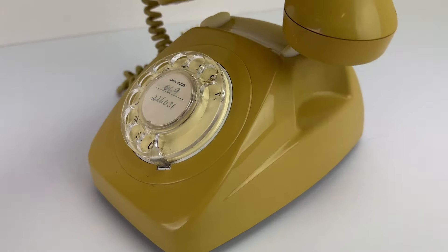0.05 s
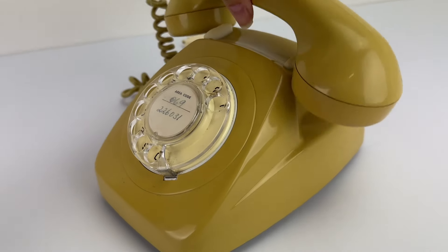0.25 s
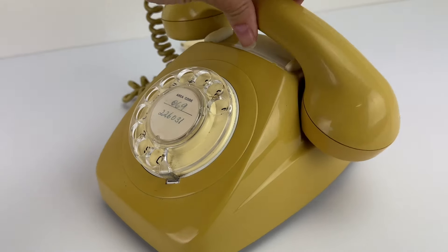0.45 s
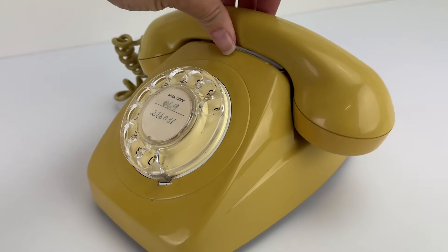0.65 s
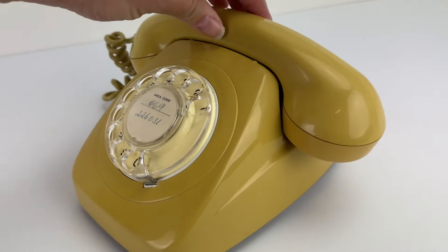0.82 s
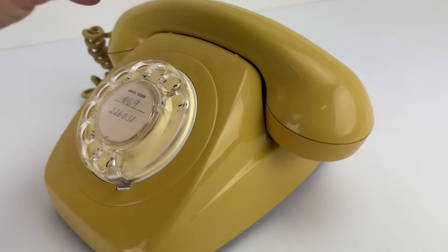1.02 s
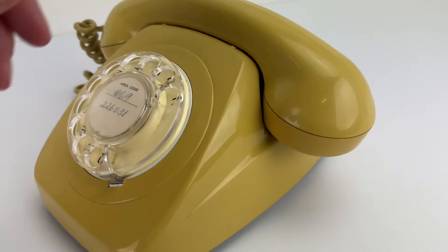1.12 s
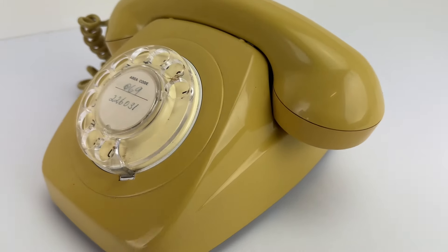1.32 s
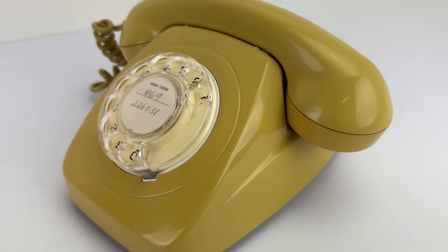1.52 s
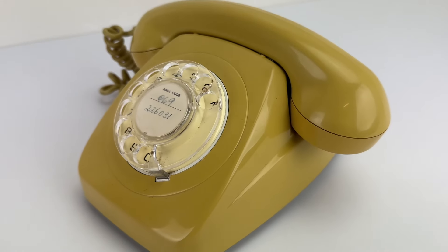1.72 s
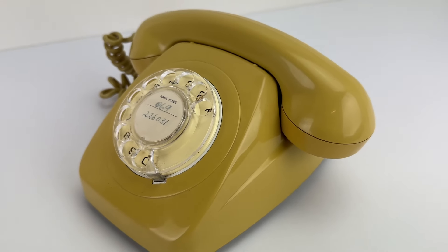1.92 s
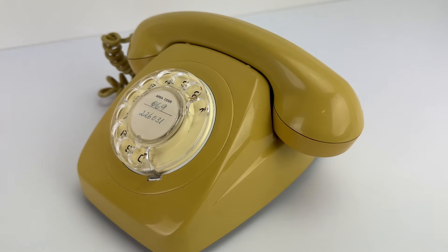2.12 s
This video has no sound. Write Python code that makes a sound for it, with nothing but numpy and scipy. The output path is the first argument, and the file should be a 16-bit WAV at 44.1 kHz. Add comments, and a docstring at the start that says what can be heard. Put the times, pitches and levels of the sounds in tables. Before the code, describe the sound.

A hollow plastic telephone handset lands on its cradle, close up in a small room. A faint touch at 0.07 seconds, then a rapid clatter at 0.25-0.29 with a low table thud, a lighter knock at 0.42, small switch ticks around 0.5, and hard clacks at 0.59 and 0.67. Brief gritty sliding and short reflections fade by 0.9; faint rustles near 1.3 and 1.6 over soft low rumble.

```python
"""A small quiet room: a hard plastic telephone handset is lowered onto its cradle.
Knocks ring the modes of the hollow shell under noise cracks; low damped tones thud in the table.
The hook switch ticks and snaps, the handset slides as grainy hiss, and a faint rustle follows
as the hand leaves. Dense reflections and a low noise rumble fill the room."""
import sys
import numpy as np
from scipy import signal
from scipy.fft import rfft, irfft, next_fast_len
from scipy.io import wavfile

SR = 44100
rng = np.random.default_rng(int(sys.argv[2]) if len(sys.argv) > 2 else 0)


def int16_out(signal):
    """Quantize to a 16-bit WAV file."""
    q = np.round(np.clip(np.atleast_2d(signal).T, -1, 1) * 32767)
    wavfile.write(sys.argv[1], SR, q.astype(np.int16))


def volts_from_decibels(level):
    """Turn decibel levels (scalar or array-like) into linear amplitude factors."""
    exponent = np.asarray(level, float) / 20
    return 10 ** exponent


N = 94815  # samples


def rms_one(x):
    """Scale to rms 1."""
    return x / np.sqrt(np.mean(x ** 2) + 1e-20)


def at_hz(points, hz):
    """Read a table on a log-frequency axis."""
    table_hz, value = np.array(points)[:, 0], np.array(points)[:, 1]
    return np.interp(np.log(hz), np.log(table_hz + 1), value)


def drift(rate_hz):
    """Slow random wander of spread 1: low-passed noise made at SR / 40."""
    pole = np.exp(-2 * np.pi * rate_hz * 40 / SR)
    white = rng.standard_normal(N // 40 + 2002)
    slow = signal.lfilter([1], [1, -2 * pole, pole * pole], white)[2000:]  # settled part
    return np.interp(np.arange(N) / 40, np.arange(len(slow)), rms_one(slow))


def add(out, start_s, sound):
    """Mix a sound in at its start time."""
    start = int(start_s * SR)
    out[start:start + len(sound)] += sound


def decay_pole(t60_s):
    """One-pole coefficient that falls 60 dB in t60_s."""
    return volts_from_decibels(-60 / (t60_s * SR))


def ring(start_s, hz, t60_s, rise_cycles):
    """A struck mode swells, then dies, for at most 0.25 s; also gives time since the blow."""
    start = int(start_s * SR)
    samples = np.arange(start, min(start + SR // 4, N))
    t = np.maximum(samples / SR - start_s, 0)
    swell = 1 - np.exp(-t * hz / rise_cycles)
    return t, np.sin(2 * np.pi * hz * t) * swell * volts_from_decibels(-60 * t / t60_s)


EDGES_HZ = 22 * 2 ** np.arange(0, 9.6, .4)


def bands(spectrum, size, channels):
    """Yield centre_hz and coloured noise of each band whose centre lies in the spectrum."""
    white = rng.standard_normal((2, channels, size + 4000))  # neighbouring bands use different noise
    for k, (low_hz, high_hz) in enumerate(zip(EDGES_HZ, EDGES_HZ[1:])):
        centre_hz = np.sqrt(low_hz * high_hz)
        if spectrum[0][0] <= centre_hz <= spectrum[-1][0]:
            sos = signal.butter(2, [low_hz, high_hz], "band", fs=SR, output="sos")
            noise = signal.sosfilt(sos, white[k % 2])[:, 4000:]
            yield centre_hz, volts_from_decibels(at_hz(spectrum, centre_hz)) * noise


# plastic decay before scaling: pitch_hz, t60_s
CRACK_T60 = [(700, 0.031), (3000, 0.052), (8000, 0.053), (16000, 0.0094)]


def bursts(starts_s, levels_db, spectrum, t60_scale):
    """Noise starts at each time and dies at its own pace in each band."""
    clicks = np.full(N, 1e-18)
    np.add.at(clicks, (np.asarray(starts_s) * SR).astype(int), volts_from_decibels(levels_db))
    out = np.zeros(N)
    for hz, noise in bands(spectrum, size=N, channels=1):
        pole = decay_pole(t60_scale * at_hz(CRACK_T60, hz))
        out += noise[0] * signal.lfilter([1], [1, -pole], clicks)
    return out


# shell blows: start_s, ring_db, tilt_db_per_octave, pitch_ratio, free_ring_s (until grip or cradle damps)
KNOCKS = [(0.0659, -44, -12, 1.2, 0.0057), (0.245, -24.5, 4.5, 1.16, 0.005),
          (0.2473, -15.5, -1, 0.93, .003), (0.2534, -15.5, 0.5, 1.04, .003), (0.2687, -23, 6.5, 1.1, .003),
          (.2700, -18, 4, 0.97, 0.0098), (.2737, -12, -1, 1.032, .007), (.2870, -28.5, 0.5, 1.3, 0.0027),
          (.4203, -20.5, 2.5, 1.04, .007), (.4320, -27.5, 6, 0.81, .008), (0.5846, -32, 8, 0.89, 0.0046),
          (.5888, -15.5, -3.5, 0.94, 0.0038), (0.5935, -17.5, 2, 0.93, 0.0036),
          (.6035, -18, 0, 0.96, 0.0053), (0.651, -43, 1, 1.7, .003), (0.6678, -25.5, 5.5, 0.56, 0.001),
          (0.6705, -10, 0, 1.031, .017), (.6950, -28.5, 1, 1.12, 0.013)]
# free modes of the hollow handset and case: pitch_hz, level_db, t60_s
SHELL = [(242.7, -13.5, .06), (385.2, -5, 0.13), (478.2, -4.5, 0.071), (528, 5.5, .11), (590, -3, 0.039),
         (679, -5, 0.098), (987, -12.5, 0.079), (1175, -10, 0.099), (1274, -17.5, 0.09),
         (1538, -11.5, 0.031), (1956, -31, 0.11), (2260, -22.5, 0.15), (2604, -22.5, 0.15),
         (3030, -31, .04), (3710, -38.5, 0.12), (5200, -33, 0.0067)]
RISE_CYCLES = 0.63  # swell time constant
SPOT_DB = 1.5  # random spread of mode levels with the struck spot
IN_STEP_HZ = (350, 800)  # modes inside start in step, others alternate in sign
DAMPED_T60_S, DAMPED_DB = .028, -15.5  # fast loss once damped; share that rings on
SHELL_ROUGH = .8  # loose parts blur what rings on


def shell():
    """Each knock swells all shell modes; damping then kills most of the ring."""
    out = np.zeros(N)
    spots = rng.standard_normal((len(KNOCKS), len(SHELL)))
    hz, mode_db, t60_s = np.transpose(SHELL)
    blur = 1 + SHELL_ROUGH * drift(60)
    in_step = (hz > IN_STEP_HZ[0]) & (hz < IN_STEP_HZ[1])
    sign = np.where(in_step, 1, (-1) ** np.arange(1, len(hz) + 1))
    for (start_s, ring_db, tilt_db, pitch, free_s), spot in zip(KNOCKS, spots):
        t, modes = ring(start_s, pitch * hz[:, None], t60_s[:, None], RISE_CYCLES)
        brightness_db = tilt_db * np.log2(hz / 540)
        gains = sign * volts_from_decibels(ring_db + mode_db + brightness_db + SPOT_DB * spot)
        damped = volts_from_decibels(-60 * np.maximum(t - free_s, 0) / DAMPED_T60_S)
        rings_on = volts_from_decibels(DAMPED_DB) * (1 - damped) * blur[int(start_s * SR):][:len(t)]
        add(out, start_s, gains @ modes * (damped + rings_on))
    return out


# hardest contacts: start_s, level_db
CRACKS = [(0.0655, -36), (0.243, -29.5), (0.244, -31.5), (0.255, -27), (0.2675, -21.5), (0.27, -47),
          (0.29, -40), (0.4208, -33), (0.438, -48), (0.5852, -19), (.5890, -24.5), (0.595, -26),
          (0.65, -32.5), (0.6683, -17), (0.678, -23), (0.689, -28)]
# plastic on plastic: pitch_hz, density_db_per_hz
CRACK = [(700, -19.5), (1500, 5.5), (3000, -0.5), (4200, -0.5), (6300, -10), (8500, -2.5), (11000, -2.5),
         (14000, -19), (16000, -20)]
SPIT_DB, SPIT_T60_SCALE = 3.5, .2  # first instant of a crack


def cracks():
    """Hard contacts burst into noise: a brief spit over a longer decay."""
    start_s, level_db = np.transpose(CRACKS)
    body = bursts(start_s, level_db, CRACK, t60_scale=1)
    return body + bursts(start_s, level_db + SPIT_DB, CRACK, t60_scale=SPIT_T60_SCALE)


# table takes the weight: start_s, level_db, pitch_hz, t60_s
THUDS = [(0.25, -18, 130, 0.086), (.275, -27, 200, 0.15), (0.283, -30, 90, 0.25), (0.297, -32, 40, 0.45),
         (0.433, -27.5, 145, 0.17), (.600, -31, 100, 0.36), (0.679, -25.5, 95, 0.23),
         (0.683, -28, 190, 0.24), (0.688, -24.5, 40, 0.2), (0.736, -17, 110, 0.039)]
THUD_RISE_CYCLES = 0.4


def thuds():
    """The table answers the weight with low damped modes."""
    out = np.zeros(N)
    for start_s, level_db, hz, t60_s in THUDS:
        add(out, start_s, volts_from_decibels(level_db) * ring(start_s, hz, t60_s, THUD_RISE_CYCLES)[1])
    return out


# hook switch ticks: start_s, level_db, pitch_hz, t60_s
TICKS = [(0.1546, -44, 2100, 0.01), (.4510, -38, 1950, .025), (0.453, -41.5, 1580, .025),
         (0.478, -39, 1907, .025), (.4990, -40.5, 2073, 0.068), (0.601, -31, 1940, 0.11),
         (0.618, -37, 3030, 0.042), (.6690, -24.5, 5200, .02), (.6900, -50, 4275, 0.14),
         (0.729, -52.5, 4458, .1), (0.278, -45.5, 4260, .15), (1.815, -69.5, 1477, .02)]
TICK_ROUGH = 1.2  # rattle depth
# plunger snaps: start_s, level_db
SNAPS = [(.4990, -34), (0.041, -71), (.5420, -53), (0.81, -49.5)]
# snap colour: pitch_hz, density_db_per_hz
SNAP = [(1200, 10.5), (3500, 3.5), (6000, -5), (8500, 1.5), (11000, -11.5), (14000, -22), (16000, -20)]


def switch():
    """Small sprung parts tick and rattle, each at one pitch; plungers snap as noise bursts."""
    ticks = np.zeros(N)
    for start_s, level_db, hz, t60_s in TICKS:
        add(ticks, start_s, volts_from_decibels(level_db) * ring(start_s, hz, t60_s, RISE_CYCLES)[1])
    rattle = 1 + TICK_ROUGH * drift(140)
    return ticks * rattle + bursts(*np.transpose(SNAPS), SNAP, t60_scale=0.98)


CATCHES_PER_S, CATCH_DB, CATCH_T60_S = 450, 3, 0.011


def friction(curve, spectrum, patchy_db, grain):
    """Patchy hiss under a level curve; random catches add decaying grains."""
    hiss = np.zeros(N)
    for _, noise in bands(spectrum, size=N, channels=1):
        hiss += noise[0] * volts_from_decibels(patchy_db * drift(17))
    height = volts_from_decibels(CATCH_DB * np.minimum(rng.exponential(1, N), 3))
    catches = (rng.random(N) < CATCHES_PER_S / SR) * height
    grains = signal.lfilter([1], [1, -decay_pole(CATCH_T60_S)], catches + 1e-18)
    level_db = np.interp(np.arange(N) / SR, *np.transpose(curve))
    return volts_from_decibels(level_db) * rms_one(hiss * (1 + grain * grains))


# handset on cradle: time_s, level_db
SLIDE = [(.2, -130), (.26, -70), (.3, -59), (.41, -67.5), (.44, -58.5), (.53, -60), (.545, -49.5),
         (.575, -57), (.66, -56), (.74, -59.5), (.85, -83), (.95, -130)]
# slide colour: pitch_hz, density_db_per_hz
SLIDE_COLOUR = [(1000, -1), (2000, 7), (4000, -1.5), (7000, -3.5), (11000, -1.5), (14000, 0), (16000, -10)]


def slide():
    """The handset slides on the cradle and catches in small grains."""
    return friction(SLIDE, SLIDE_COLOUR, patchy_db=-2.5, grain=1)


# faint rustle, with a small snap at 1.298 s: time_s, level_db
RUSTLE = [(1.0, -105), (1.05, -79.5), (1.28, -85), (1.298, -73.5), (1.32, -82), (1.52, -87), (1.57, -69.5),
          (1.65, -73.5), (1.72, -95), (1.79, -100), (1.825, -79), (1.87, -105)]
# faint hiss colour, with narrow dips: pitch_hz, density_db_per_hz
RUSTLE_COLOUR = [(2060, -38), (3500, -13), (3950, -14.5), (4600, -10), (8100, -10), (9560, -21.5),
                 (10100, -7), (11200, -5.5), (12300, -13), (12600, -27), (14500, -8), (16000, -43)]


def rustle():
    """A faint patchy hiss free of grains; a short bump in its level makes a small snap."""
    return friction(RUSTLE, RUSTLE_COLOUR, patchy_db=0.5, grain=0)


# near sounds at the two ports: pitch_hz, left_lead_rad
LEAD = [(0, 0), (1030, -0.5), (3700, 1.0), (4220, 0.8), (4740, 6.8), (5170, 6.1), (8010, 6.4),
        (11500, -0.8), (12000, -2.7), (13000, -3.4), (13700, -6.2), (14500, -6.2), (15100, -9.2),
        (16200, -9.6)]
BOUNCE_S, BOUNCE_DB, BOUNCE_HZ = 0.0012, -5.5, (1400, 6500)  # off the tabletop


def ports(x):
    """Two microphone ports hear a pitch-dependent phase lead and one reflection in opposite signs."""
    size = next_fast_len(N)
    left_right = np.array([[1], [-1]])
    lead_rad = np.interp(np.arange(size // 2 + 1) * SR / size, *np.transpose(LEAD))
    direct = irfft(rfft(x, size) * np.exp(.5j * lead_rad * left_right), size)[:, :N]
    sos = signal.butter(1, BOUNCE_HZ, "band", fs=SR, output="sos")
    bounce = signal.sosfilt(sos, np.roll(x, int(BOUNCE_S * SR)))
    return direct + volts_from_decibels(BOUNCE_DB) * bounce * left_right


# reflections: pitch_hz, level_db
ROOM_COLOUR = [(40, -2), (250, -5.5), (550, -3.5), (1200, -4), (2000, -1.5), (3500, 0), (8000, -1),
               (17000, -20.5)]
# reflection decay: pitch_hz, t60_s
ROOM_T60 = [(100, 0.98), (500, 0.31), (2000, 0.39), (5000, 0.36), (9000, 0.18), (16000, 0.12)]
ROOM_DB, ROOM_SIDE_DB, ROOM_SIDE_HZ = -12, -3, 500


def room(x):
    """Dense reflections, as 0.5 s of noise that dies band by band."""
    t = np.arange(SR // 2) / SR
    tail = np.zeros((2, len(t)))
    for hz, noise in bands(ROOM_COLOUR, size=len(t), channels=2):
        tail += noise * volts_from_decibels(-60 * t / at_hz(ROOM_T60, hz))
    mid, side = tail
    sos = signal.butter(1, ROOM_SIDE_HZ, "high", fs=SR, output="sos")
    side = volts_from_decibels(ROOM_SIDE_DB) * signal.sosfilt(sos, side)
    onset = np.minimum(t / 0.0051, 1)
    echo = np.array([mid + side, mid - side]) * onset / np.sqrt(SR / 50)
    return volts_from_decibels(ROOM_DB) * signal.fftconvolve(x[None], echo, axes=1)[:, :N]


# building noise: pitch_hz, density_db_per_hz
RUMBLE = [(18, -60), (30, -34), (52, -8), (75, 0), (123, -9), (361, -22.5), (474, -14), (508, -23),
          (2690, -46.5), (3610, -68.5), (7000, -71), (9100, -93), (15400, -120)]
# left-right likeness of the rumble: pitch_hz, correlation
LIKENESS = [(60, 1), (180, 0.79), (550, 0.51), (1650, -0.34), (4970, 0.34), (15000, 0.05)]
RUMBLE_DB, LEFT_DB = -46.5, .3  # left is raised and right lowered by LEFT_DB


def rumble():
    """Low noise of the building wavers gently, most alike at both ports in the bass."""
    left_right = np.array([[1], [-1]])
    out = np.zeros((2, N))
    for hz, (mid, side) in bands(RUMBLE, size=N, channels=2):
        alike = np.clip(at_hz(LIKENESS, hz), -1, 1)
        stereo = np.sqrt(1 + alike) * mid + np.sqrt(1 - alike) * side * left_right
        out += volts_from_decibels(2.0 * drift(8.8)) * stereo
    return volts_from_decibels(RUMBLE_DB + LEFT_DB * left_right) * rms_one(out)


def scene():
    """Telephone and hand near the microphone, in the room."""
    near = shell() + cracks() + thuds() + switch() + slide()
    return ports(near + rustle()) + room(near) + rumble()


def top_cut(x):
    """Nothing passes above the cut-off."""
    return signal.sosfilt(signal.butter(12, 16660, fs=SR, output="sos"), x)


MIC_LOW_HZ, CUTOFF_HZ = 40, 17300


def record(dry):
    """The microphone loses the deepest bass and the top is cut."""
    x = signal.sosfilt(signal.butter(2, MIC_LOW_HZ, "high", fs=SR, output="sos"), dry)
    x = signal.sosfilt(signal.cheby2(12, 70, CUTOFF_HZ, fs=SR, output="sos"), x)
    return top_cut(x)


dry = scene()
out = record(dry)
int16_out(out)
```